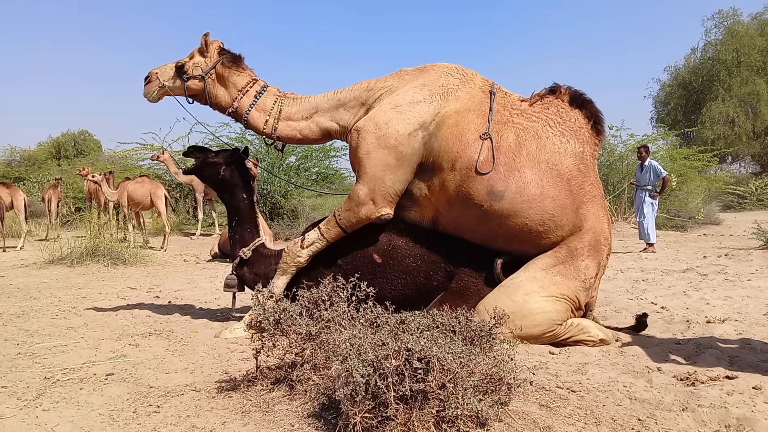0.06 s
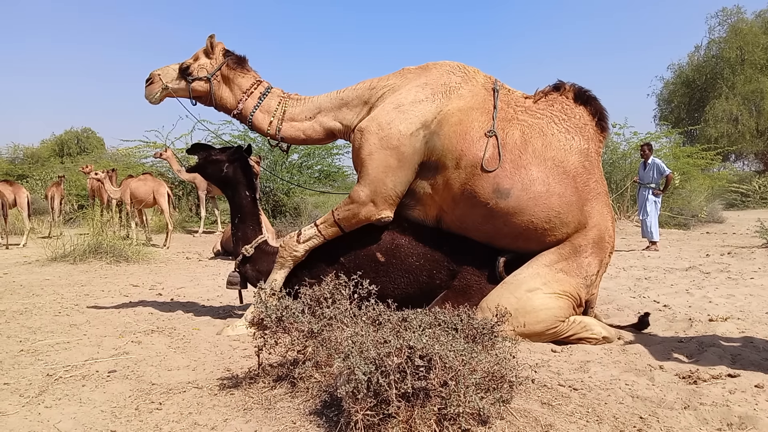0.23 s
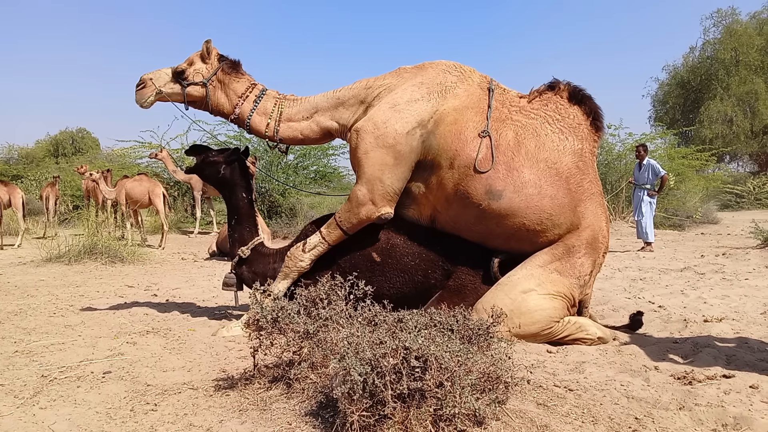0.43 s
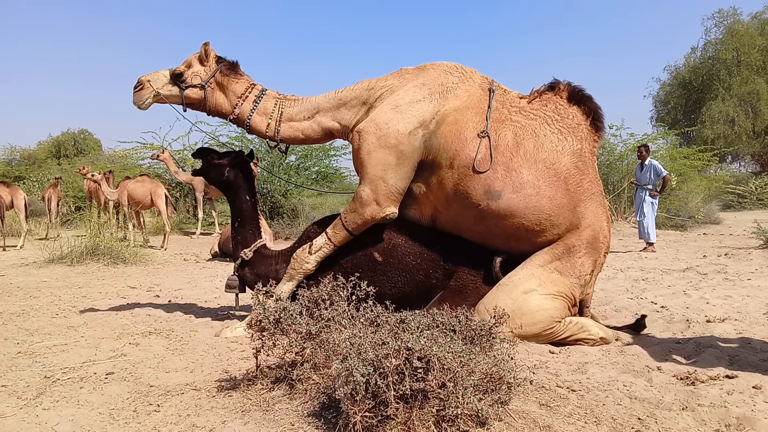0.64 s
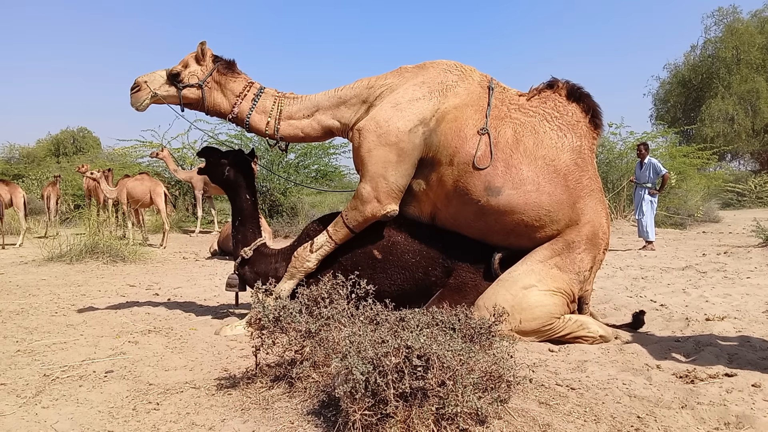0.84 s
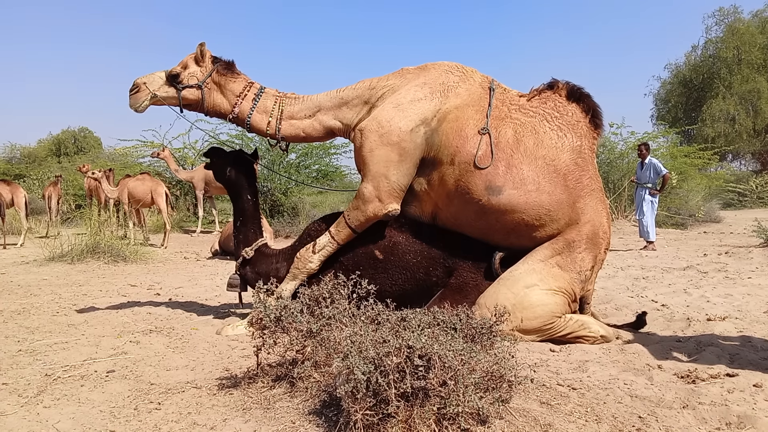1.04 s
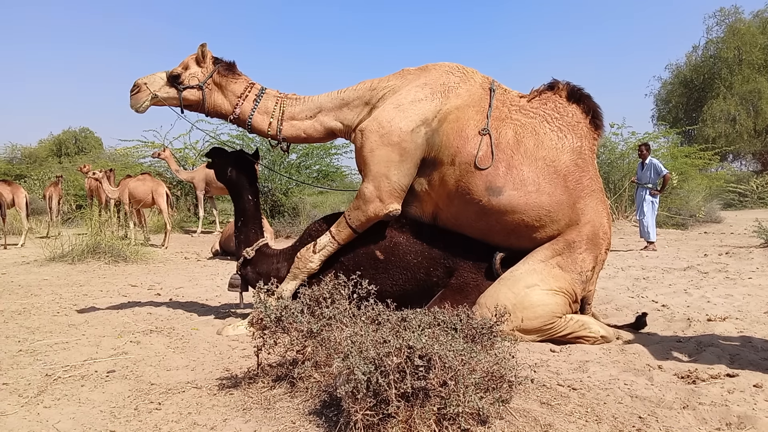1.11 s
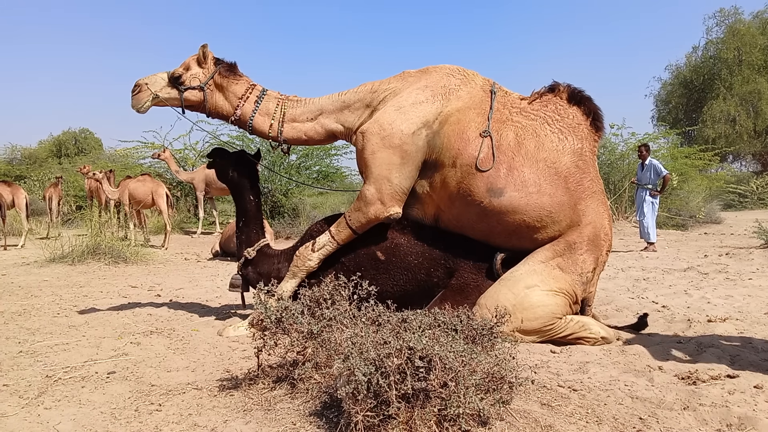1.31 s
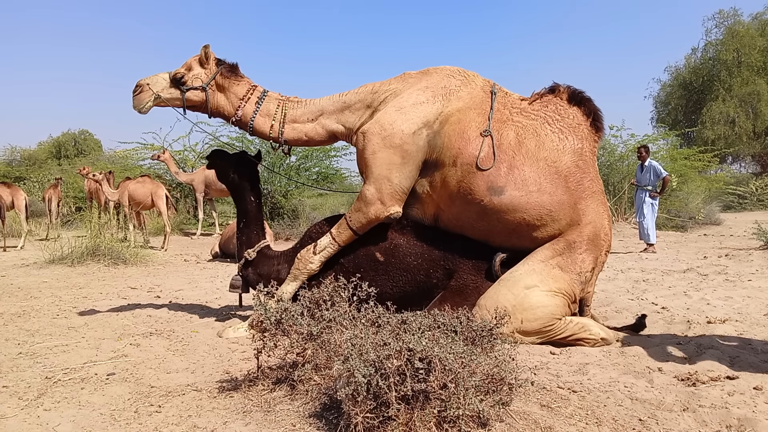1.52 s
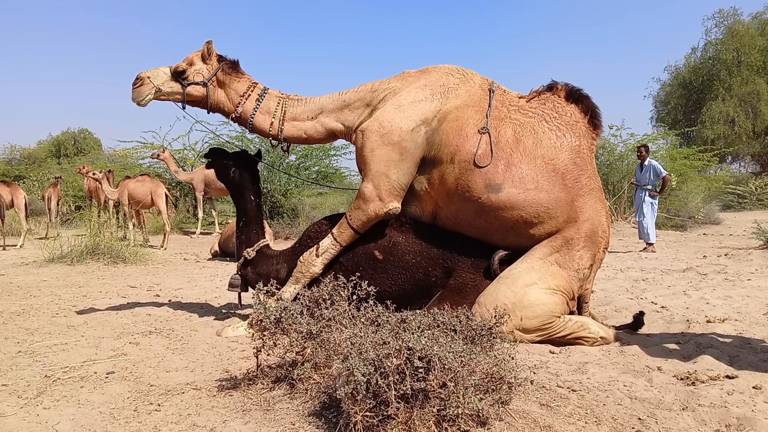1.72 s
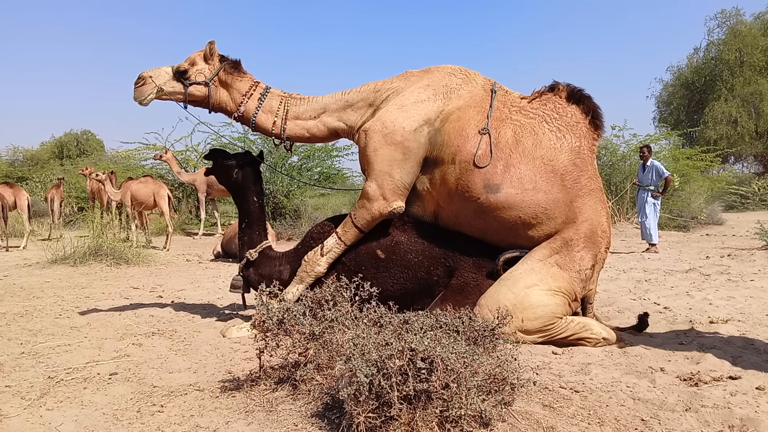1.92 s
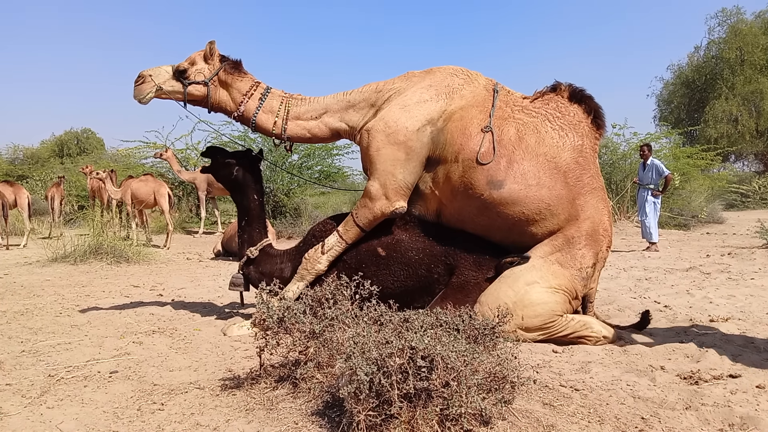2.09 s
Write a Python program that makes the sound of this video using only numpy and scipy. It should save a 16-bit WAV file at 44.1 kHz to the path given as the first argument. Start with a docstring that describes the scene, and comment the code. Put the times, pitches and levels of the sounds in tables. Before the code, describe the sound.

Close to the microphone, a camel groans once, loud and raspy, then after a short lull makes a much quieter bubbling gurgle with brief squeaks. Behind it are only a faint breeze and far-off herd calls on open sand.

```python
"""A camel gives one loud, rattling groan on open sand, then gurgles low in its throat.
Both follow the source-filter principle: uneven flaps of soft tissue excite resonances of the airway.
A thin harmonic squeal rides on the groan, and short squeaks accompany the gurgle.
The herd calls far off, a bell dies away and the halter clinks, each metal ringing in damped modes.
Tack and twigs tick, sand and scrub rustle in a light breeze, and bushes and trees scatter the sound."""
import sys
import numpy as np
from scipy import signal
from scipy.fft import rfft, irfft
from scipy.io import wavfile
from scipy.ndimage import uniform_filter1d

SR = 44100
rng = np.random.default_rng(int(sys.argv[2]) if len(sys.argv) > 2 else 0)


def waveform_to_disk(signal):
    """Save audio, clipped to [-1, 1], as 16-bit WAV at the path in sys.argv[1]."""
    frames = np.transpose(np.atleast_2d(signal))
    scaled = np.clip(frames, -1, 1) * 32767
    samples = np.round(scaled).astype(np.int16)
    wavfile.write(sys.argv[1], SR, samples)


N = 94815
T = np.arange(N) / SR

# spectra of the breeze and of rustling sand and scrub (frequency [Hz], relative gain [dB])
BREEZE_SPECTRUM = [(25, -44), (80, -4), (190, 2.5), (290, -12), (680, -9.5), (950, -19.5), (3800, -17.5),
                   (4700, -33.5), (6600, -24), (9000, -38.5), (15500, -30)]
RUSTLE_SPECTRUM = [(600, -14), (1300, -24), (3700, 9.5), (7000, 1), (8800, -49), (15000, -13)]
# dry rustles (time [s], level [dB], half length [s])
RUSTLE_SWELLS = [(.13, -53.5, 0.034), (1.276, -72, 0.067), (1.749, -69.5, 0.044), (2.008, -64.5, 0.073)]
# modes of the herd bell and of the halter's metal (frequency [Hz], level [dB], t60 [s])
BELL_MODES = [(658, -49, 0.74), (2540, -66, .8), (3140, -57, 0.15), (3630, -60, 0.26)]
HALTER_MODES = [(6650, -48, .08), (8446, -57, 0.12), (10900, -48.5, .08), (11700, -52.5, .07)]
# calls of the herd, one curve each (time [s], pitch [Hz], level [dB])
HERD_CALLS = [
    [(1.08, 354.8, -63.5), (1.24, 338, -66.5), (1.47, 349, -63), (1.57, 391, -65)],
    [(1.38, 525, -74), (1.52, 492, -62), (1.62, 453.3, -66), (1.79, 367.3, -60), (1.86, 324, -73)],
    [(1.93, 393, -67), (2.04, 360.6, -63), (2.15, 341, -55.5)],
]
# throat resonances of the distant herd (frequency [Hz], relative gain [dB])
HERD_SPECTRUM = [(350, 20), (720, 15.5), (1100, -4.5), (2000, -32), (6000, -44)]
# ticks of tack and twigs (time [s], level [dB], centre [Hz], bandwidth [Hz], decay [s])
TICK_BURSTS = [(.155, -52, 10600, 1400, 0.0043), (.452, -49.5, 6470, 4000, 0.016),
               (0.451, -51.5, 11200, 3000, .011), (1.342, -54.5, 2000, 4000, 0.0029),
               (1.442, -55, 2550, 2924, 0.0022), (1.738, -57.5, 2400, 1990, 0.035),
               (1.864, -53, 7100, 2500, .006)]
# whine leading into the squeaks (time [s], frequency [Hz], level [dB])
WHINE_CURVE = [(1.42, 3430, -78), (1.544, 3535, -67), (1.68, 3670, -69)]
# squeaks (time [s], level [dB], centre [Hz])
SQUEAK_CHIRPS = [(1.695, -46, 3470), (1.7221, -42, 3340), (1.7295, -53, 7430), (1.737, -41, 3480),
                 (1.77, -42, 3450), (1.7765, -52.5, 7550), (1.7838, -43, 3500)]

# gurgle in each gullet resonance (time [s], low level [dB], middle level [dB], upper level [dB])
GURGLE_LEVELS = [(1.521, -54.5, -51.5, -66.5), (1.665, -52.5, -68.5, -79.5), (1.684, -47, -70, -78),
                 (1.775, -44.5, -70, -65), (1.799, -45, -47, -49), (1.832, -40, -57, -70),
                 (1.859, -45.5, -42.5, -55.5), (1.93, -39, -40.5, -59.5), (2.06, -46, -52.5, -67),
                 (2.127, -47, -49, -63.5), (2.15, -49.5, -58, -61)]
# the three gullet resonances (frequency [Hz], relative gain [dB])
LOW_GULLET = [(35, -51), (60, -14), (85, -4.5), (138, 4.5), (185, -5), (300, -35.5), (900, -76.5)]
MIDDLE_GULLET = [(70, -47.5), (205, 7.5), (245, 8), (310, -16.5), (480, -46.5)]
UPPER_GULLET = [(450, -32.5), (580, -10), (640, 3.5), (720, -10), (1000, -30), (2200, -57)]
# grunts and gulps (time [s], level [dB], frequency [Hz], half length [s])
GULP_PULSES = [(.2, -35, 262, 0.0088), (1.005, -44.5, 153.4, 0.021), (1.017, -29.5, 170, 0.0043),
               (1.052, -42, 114, 0.016), (1.095, -52.5, 255, 0.015), (2.125, -37.5, 150, 0.0049)]

# high second voice (time [s], pitch [Hz], level [dB])
SQUEAL_CURVE = [(0.191, 275, -49), (.35, 307.2, -52), (0.581, 294.7, -56), (.735, 240.2, -55),
                (.79, 249.4, -43), (.83, 295.8, -50.5), (.917, 308.5, -42.5), (.955, 254.3, -49),
                (.985, 232, -74)]
# its throat resonances (frequency [Hz], relative gain [dB])
SQUEAL_SPECTRUM = [(300, -12), (820, 8), (1020, -8.5), (1230, 10), (1800, -5.5), (2650, -0.5), (3000, -3),
                   (3500, 2), (4400, -23), (6200, -10.5), (8500, -40), (10800, -28.5)]
# strained wheezes (time [s], level [dB], half length [s], centre [Hz])
WHEEZE_SWELLS = [(0.257, -41, 0.014, 3550), (0.369, -41, 0.017, 3450), (0.647, -44.5, 0.021, 3720),
                 (0.759, -40, 0.023, 3360), (0.947, -47.5, 0.01, 2600)]
# resonance of a wheeze (frequency [multiple of the centre], relative gain [dB])
WHEEZE_SPECTRUM = [(.7, -31.5), (.9, -8), (0.999, -1.5), (1.07, -5), (1.22, -32.5)]

# groan (time [s], chest level [dB], throat level [dB], mouth level [dB], rasp level [dB])
GROAN_LEVELS = [(0.188, -47, -38, -56, -55), (0.232, -45.5, -32, -37.5, -46.5),
                (0.247, -54, -25, -28, -40.5), (0.334, -46, -21.5, -18, -35),
                (.42, -39, -22.5, -21.5, -33.5), (0.56, -33.5, -23, -20, -37),
                (0.659, -40.5, -22.5, -22, -30.5), (0.751, -50, -24.5, -25, -33.5),
                (0.774, -45.5, -25, -31.5, -37), (0.851, -37.5, -23.5, -36, -41.5),
                (0.869, -52, -33.5, -49, -42), (0.894, -55, -61.5, -58.5, -81.5)]
# flapping of the throat (time [s], rate [Hz], timing scatter [periods])
FLAP_CURVE = [(0.201, 173.2, 0.17), (.255, 192.6, 0.34), (.29, 89.5, 0.27), (0.341, 141.5, .3),
              (.40, 95, 0.21), (.48, 88, .08), (.59, 80, .1), (0.682, 108.3, 0.24), (0.858, 111, 0.24)]
# the hardest slaps (time [s], strength [multiple of an ordinary flap])
HARD_SLAPS = [(0.2856, 2.3), (.378, 1.3), (.392, 1.2), (0.4735, 1.2), (.496, 1.1), (0.5166, 1.3),
              (.5548, 1.1), (.586, 1.1), (0.6146, 1.2), (0.6731, 1.16)]
# resonances of the airway, and the rush of air above them (frequency [Hz], relative gain [dB])
CHEST_SPECTRUM = [(40, -33), (75, -16), (125, -1.5), (190, 7), (260, -9), (500, -36)]
THROAT_SPECTRUM = [(90, -51), (170, -16), (250, -6), (335, -14), (390, -2.5), (420, 3.5), (465, -4),
                   (530, -26.5), (630, -12.5), (760, -10.5), (860, -28.5), (1300, -45.5)]
MOUTH_SPECTRUM = [(600, -45.5), (870, -22), (1030, -7.5), (1150, 3), (1290, -4), (1520, -5.5),
                  (1680, -17.5), (1775, -10.5), (1950, -24), (2700, -27.5), (3100, -48), (4650, -40),
                  (6000, -64.5)]
RASP_SPECTRUM = [(1300, -27.5), (2000, 6.5), (2300, 2.5), (2750, 2.5), (3050, -18.5), (3900, -17),
                 (4650, -10), (5400, -22.5), (7000, -44)]
HISS_SPECTRUM = [(3500, -11.5), (6500, 2), (8600, -28), (10800, -4), (14500, -26)]


def amp(db):
    """Amplitude ratio of a level in decibels."""
    return 10 ** (np.asarray(db) / 20)


def unit_rms(x):
    """Normalisation to unit mean power."""
    return x / np.sqrt(np.mean(x ** 2) + 1e-20)


def envelope(times, db, edge_s=.006):
    """Amplitude envelope: interpolated in decibels, fading to silence beyond its ends."""
    inside = np.clip(np.minimum(T - times[0], times[-1] - T) / edge_s + 1, 0, 1)
    return amp(np.interp(T, times, db)) * inside


def swells(rows):
    """Superposition of Gaussian envelopes."""
    return sum(amp(db) * np.exp(-((T - at) / half) ** 2) for at, db, half in rows)


def gain_db(spectrum, hz):
    """Interpolation of a spectrum on a logarithmic frequency axis."""
    f, db = np.transpose(spectrum)
    return np.interp(np.log(hz + 1), np.log(f), db)


def resonate(x, spectrum):
    """Minimum-phase filtering by a spectrum, rolling off above its last point; unit rms out."""
    hz = abs(np.fft.fftfreq(8192, 1 / SR))
    log_gain = np.log(amp(gain_db(spectrum, hz)) / np.maximum(hz / spectrum[-1][0], 1) ** 2)
    response = np.fft.ifft(np.exp(np.conj(signal.hilbert(log_gain)))).real
    return unit_rms(signal.fftconvolve(x, response[:len(hz) // 2])[:N])


def drift(hz):
    """Random modulation: low-passed noise of unit rms."""
    rolloff = 1 + (np.fft.rfftfreq(N, 1 / SR) / hz) ** 4
    return unit_rms(irfft(rfft(rng.standard_normal(N)) / rolloff, N))


def steady(x, size=2600):
    """Division by the running rms, which evens out slow swings of level."""
    power = uniform_filter1d(uniform_filter1d(x ** 2, size), size // 2)
    return x / np.sqrt(power + 1e-6)


def voice(hz, throat, breath, harmonics):
    """Source-filter voice: fluttering harmonics and noise share one throat spectrum."""
    cycles, flutter_db = np.cumsum(hz) / SR, 2.5
    tone = np.zeros(N)
    for k in range(1, harmonics + 1):
        gain = amp(gain_db(throat, k * hz) + flutter_db * drift(17))
        tone += gain * np.cos(2 * np.pi * (k * cycles + rng.random()))
    return unit_rms(steady(tone) + breath * resonate(rng.standard_normal(N), throat))


def flaps(rate, scatter, slaps=(), rebound_s=.004, puff_s=.005):
    """Impulse excitation: soft tissue slaps unevenly and rebounds, releasing puffs of air."""
    beats = np.flatnonzero(np.diff(np.floor(np.cumsum(rate) / SR)))
    jitter, lag, rebound = rng.standard_normal((3, len(beats)))
    onsets = beats + (jitter * (scatter / rate)[beats] * SR).astype(int)
    strength, train = np.ones(len(beats)), np.zeros(N)
    for at, hardness in slaps:
        nearest = np.argmin(abs(onsets - at * SR))
        onsets[nearest], strength[nearest] = at * SR, hardness
    rebound_onsets = onsets + (rebound_s * SR * np.exp(.4 * lag)).astype(int)
    train[onsets % N] += strength
    train[rebound_onsets % N] += .51 * strength * abs(rebound)
    airflow = signal.lfilter([1], [1, -np.exp(-1 / (puff_s * SR))], train)
    return unit_rms(train), unit_rms(airflow * rng.standard_normal(N))


def echo(x, db, t60):
    """Diffuse scattering: convolution with exponentially decaying noise."""
    response = rng.standard_normal(N) * amp(-60 * T / t60) * (T > .004)
    return amp(db) * signal.fftconvolve(x, response / np.linalg.norm(response))[:N]


def breeze():
    """Broadband noise of lightly moving air, nearly constant in level."""
    return amp(-59 + .43 * drift(21)) * resonate(rng.standard_normal(N), BREEZE_SPECTRUM)


def rustles():
    """Rapid amplitude modulation of noise gives the grain of sand and scrub."""
    grains = rng.standard_normal(N) * amp(1.1 * drift(270))
    return swells(RUSTLE_SWELLS) * resonate(grains, RUSTLE_SPECTRUM)


def herd():
    """Harmonic calls from far off, faint and dull because their upper partials are weak."""
    out = np.zeros(N)
    for call in HERD_CALLS:
        times, pitch, db = np.transpose(call)
        hz = np.interp(T, times, pitch) * (1 + .01158 * drift(40.8))
        out += envelope(times, db) * voice(hz, HERD_SPECTRUM, breath=.34, harmonics=8)
    return out


def struck_metal(modes, at):
    """Free vibration of metal: a sum of exponentially damped modes."""
    age = np.maximum(T - at, 0)
    return sum(amp(db - 60 * age / t60) * np.sin(2 * np.pi * hz * age) for hz, db, t60 in modes)


def ticks():
    """Transients of tack and twigs: each a decaying burst of noise in one resonance."""
    f, out = np.fft.rfftfreq(N, 1 / SR), np.zeros(N)
    for at, db, hz, width, decay in TICK_BURSTS:
        rolloff = 1 + (2 * (f - hz) / width) ** 2
        band = unit_rms(irfft(rfft(rng.standard_normal(N)) / rolloff, N))
        out += amp(db) * band * (T >= at) * np.exp(-abs(T - at) / decay)
    return out


def squeaks(decay_s=.0015, fall_hz_per_s=120000):
    """Frequency modulation: a wavering whine breaks into falling chirps, perhaps of grinding teeth."""
    times, pitch, whine_db = np.transpose(WHINE_CURVE)
    whine_hz = np.interp(T, times, pitch) * (1 + .0174 * drift(178))
    out = envelope(times, whine_db) * unit_rms(np.sin(2 * np.pi * np.cumsum(whine_hz) / SR))
    for at, db, hz in SQUEAK_CHIRPS:
        t = T - at
        cycles = t * (hz - fall_hz_per_s * t / 2)
        out += amp(db) * np.exp(-abs(t) / decay_s) * np.sin(2 * np.pi * cycles)
    return out


def gulps():
    """Short grunts and gulps: low tones under Gaussian envelopes."""
    return sum(swells([(at, db, half)]) * np.sin(2 * np.pi * hz * (T - at))
               for at, db, hz, half in GULP_PULSES)


def gurgle(flap_hz=44, air=.2):
    """Forced resonance: slow flaps behind closed lips excite three resonances of the gullet."""
    times, *levels = np.transpose(GURGLE_LEVELS)
    train, puffs = flaps(np.full(N, flap_hz), scatter=.1673)
    return sum(envelope(times, db) * steady(resonate(train + air * puffs, spectrum))
               for spectrum, db in zip((LOW_GULLET, MIDDLE_GULLET, UPPER_GULLET), levels))


def squeal(breath=.12):
    """Formant filtering: a strained high voice flares into narrow-band wheezes and sags at the end."""
    times, pitch, db = np.transpose(SQUEAL_CURVE)
    hz = np.interp(T, times, pitch) * (1 + .004 * drift(62.8))
    out = envelope(times, db) * voice(hz, SQUEAL_SPECTRUM, breath, harmonics=43)
    for *swell, centre in WHEEZE_SWELLS:
        formant = [(ratio * centre, gain) for ratio, gain in WHEEZE_SPECTRUM]
        out += swells([swell]) * voice(hz, formant, breath, harmonics=17)
    return out


def groan(air=.34, rasp_air=.78, spit_per_s=400, throat_waver=.025):
    """Source-filter principle: one train of flaps drives chest, throat, mouth and rasp resonances."""
    times, chest_db, throat_db, mouth_db, rasp_db = np.transpose(GROAN_LEVELS)
    at, rate, scatter = np.transpose(FLAP_CURVE)
    train, puffs = flaps(np.interp(T, at, rate), np.interp(T, at, scatter), HARD_SLAPS)
    spit = unit_rms(rng.standard_normal(N) * (rng.random(N) < spit_per_s / SR))
    pulses = train + .25 * spit
    drive = pulses + air * puffs
    chest = envelope(times, chest_db) * steady(resonate(drive, CHEST_SPECTRUM))
    throat = envelope(times, throat_db) * steady(resonate(drive, THROAT_SPECTRUM))
    mouth = envelope(times, mouth_db) * steady(resonate(drive, MOUTH_SPECTRUM))
    rasp = envelope(times, rasp_db) * steady(resonate(pulses + rasp_air * puffs, RASP_SPECTRUM))
    hiss = envelope(times, rasp_db - 27.5) * resonate(rng.standard_normal(N), HISS_SPECTRUM)
    # the throat's length wavers: a time warp shifts its frequencies by the rms fraction throat_waver
    wander = drift(20)
    warp_s = wander * throat_waver / np.std(np.diff(wander) * SR)
    return chest + np.interp(T + warp_s, T, throat) + mouth + rasp + hiss


def scene():
    """Superposition of all sources; the near ones also scatter from close bushes and far trees."""
    background = breeze() + rustles() + herd() + struck_metal(BELL_MODES, at=0)
    tack = ticks() + struck_metal(HALTER_MODES, at=.453)
    near = tack + squeaks() + gulps() + gurgle() + squeal() + groan()
    bushes, trees = echo(near, db=-8, t60=.18), echo(near, db=-26.5, t60=.84)
    return (background + near + bushes + trees)[None]


def record(dry):
    """Band limiting: a linear-phase low-pass removes the highest treble."""
    cutoff_hz = 15850
    lowpass = signal.firwin(511, cutoff_hz, window=("kaiser", 9), fs=SR)
    return signal.oaconvolve(dry, lowpass[None], "same")


dry = scene()
out = record(dry)
waveform_to_disk(out)
```